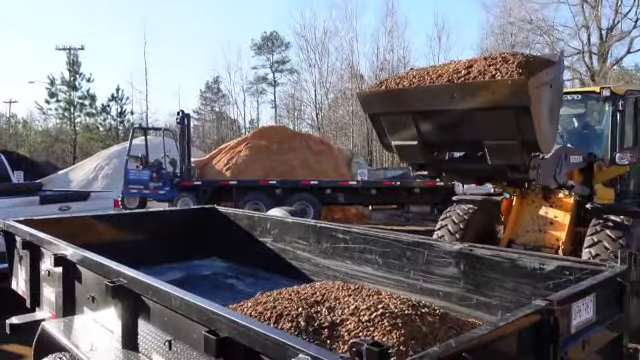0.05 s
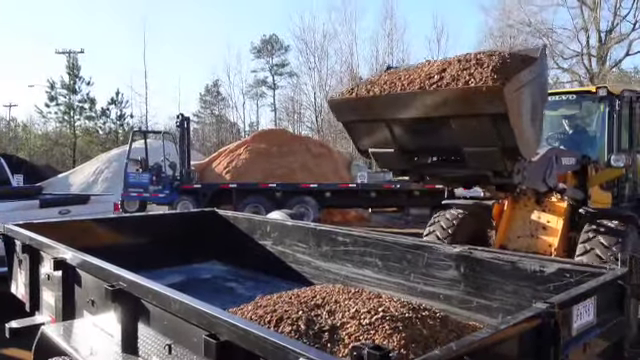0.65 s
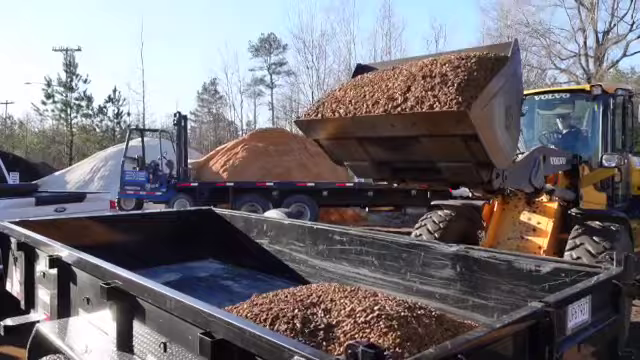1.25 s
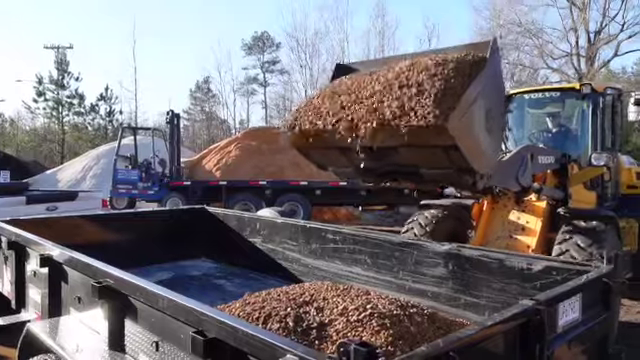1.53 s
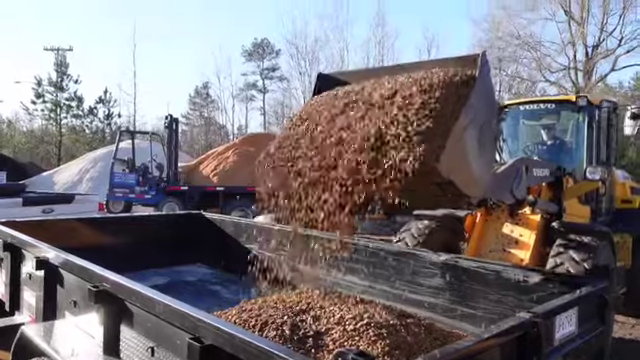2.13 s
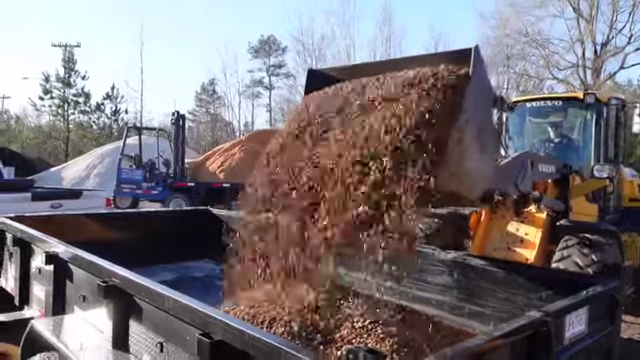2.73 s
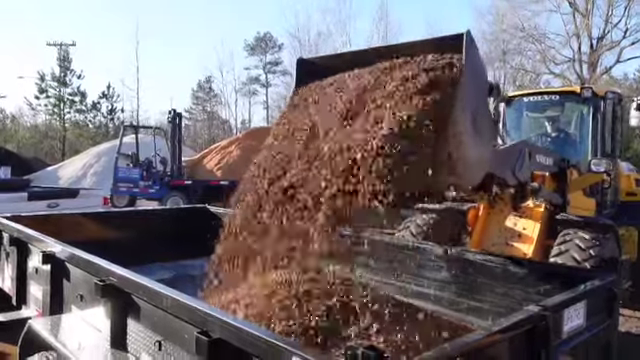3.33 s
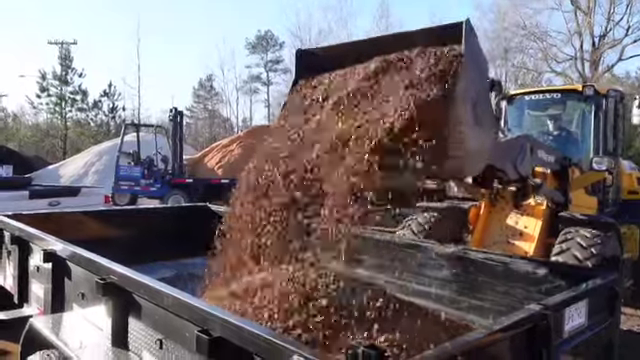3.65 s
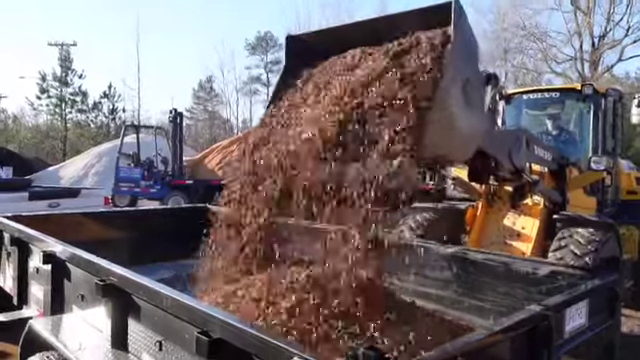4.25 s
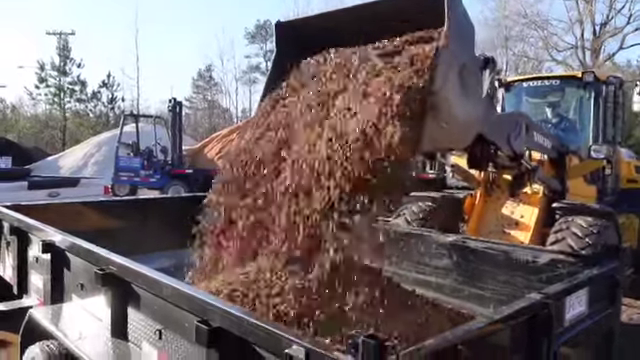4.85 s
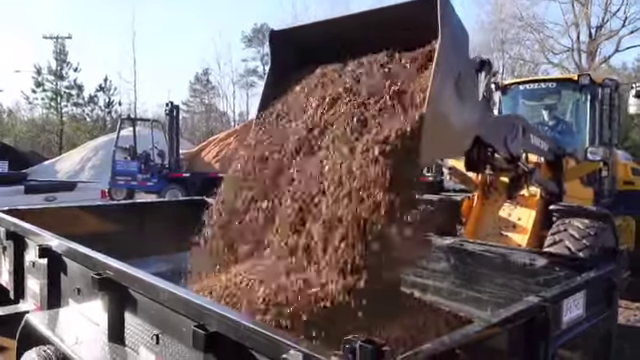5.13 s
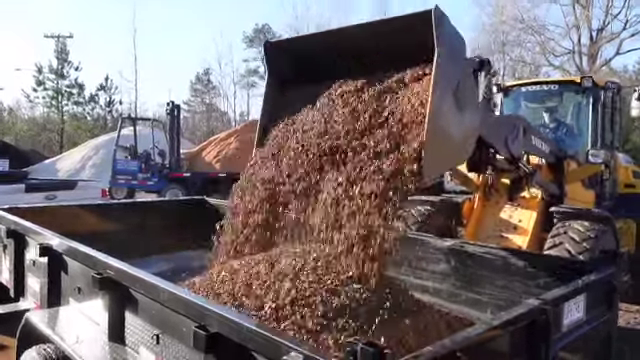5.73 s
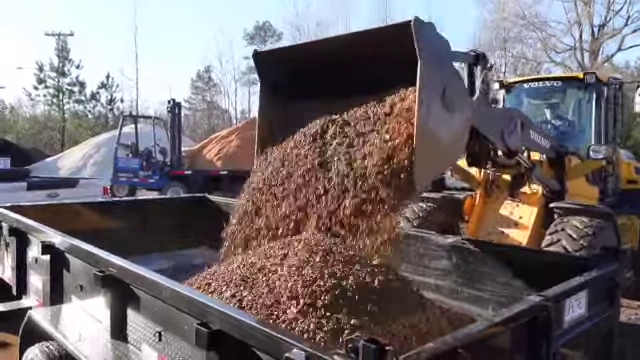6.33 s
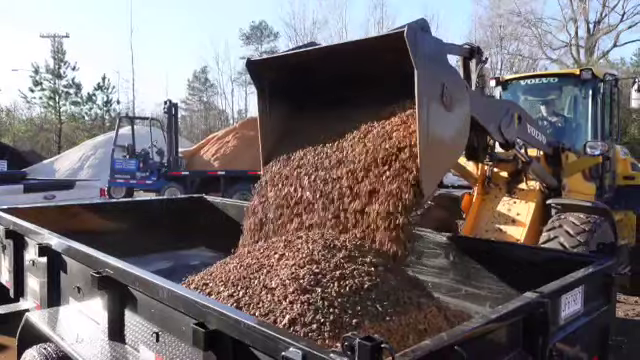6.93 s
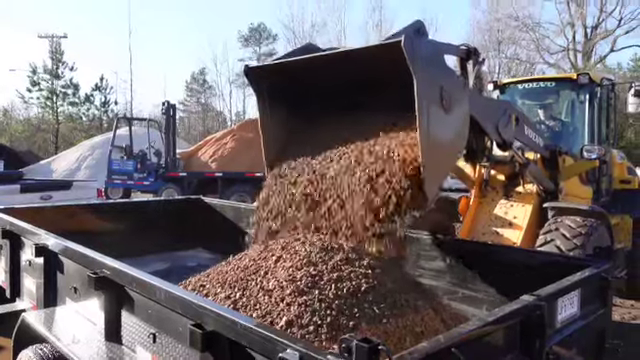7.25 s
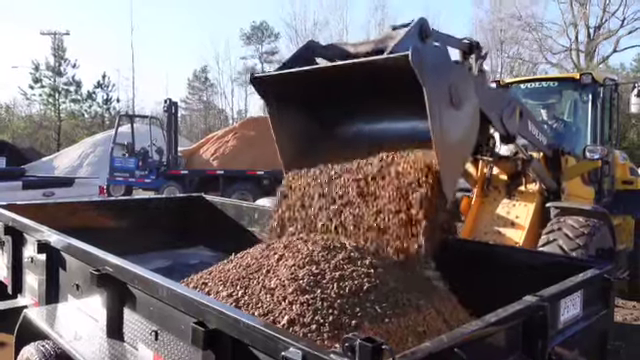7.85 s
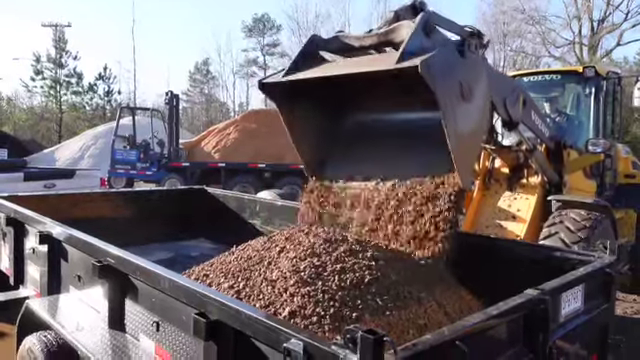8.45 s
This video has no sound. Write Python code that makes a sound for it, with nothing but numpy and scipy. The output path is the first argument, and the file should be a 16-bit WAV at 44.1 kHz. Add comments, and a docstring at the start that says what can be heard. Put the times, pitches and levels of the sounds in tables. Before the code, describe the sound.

Over a steady diesel engine, stones spill and then cascade into a metal trailer, clacking, drumming and ringing the steel.

```python
"""A wheel loader runs at raised revs; its arm knocks and a hydraulic valve gives a short hiss.
From 1.3 s river rock slides in the bucket, a few stones spill, and at 2 s the load pours into a steel
trailer: stones clack on the heap, drum on the bed and ring the bare steel until gravel covers it.
Gain control holds the rush near one level and pushes the engine down under it. Later the hydraulics
whine as the bucket tips, and masses of stone slump down the heap."""
import sys
import numpy as np
from scipy import signal
from scipy.fft import irfft
from scipy.io import wavfile
from scipy.ndimage import uniform_filter1d, minimum_filter1d

SR = 44100
rng = np.random.default_rng(int(sys.argv[2]) if len(sys.argv) > 2 else 0)


def transcribe(signal):
    """Save signal, clipped to [-1, 1], as a 16-bit WAV file at the path in sys.argv[1]."""
    frames = np.atleast_2d(signal).T
    limited = np.clip(frames, -1, 1)
    pcm = np.round(limited * 32767).astype(np.int16)
    wavfile.write(sys.argv[1], SR, pcm)


N = 383669
TIME = np.arange(N) / SR

# tone of stone on stone: f/Hz, level/dB
CLATTER_EQ = [(100, -73), (300, -17), (900, -40.5), (2000, -12), (3200, -1), (4800, 4), (7500, 6),
              (9500, 3), (12000, 0.5), (16000, -8)]
# tone of the drumming bed: f/Hz, level/dB
DRUM_EQ = [(80, -47), (250, -21), (430, -8), (590, -6.5), (740, -0.5), (920, -0.5), (1300, 3), (1480, 3),
           (1650, 3.5), (2400, 3.5), (3300, 3.5), (4500, -1), (7000, -10.5), (14000, -30.5)]
# tone of the booming trailer body: f/Hz, level/dB
BOOM_EQ = [(30, -44), (70, -25), (130, -20.5), (200, -5.5), (300, -10.5), (400, 4.5), (520, 6.5), (750, -8),
           (1500, -13)]
# drumming against the clatter, as the stream wanders between heap and steel: t/s, level/dB
DRUM_FADER = [(2.0, -11), (2.33, -13), (2.55, -8), (2.68, -8.5), (2.9, -1.5), (3.12, 0.5), (3.65, -6),
              (3.92, -11.5), (4.1, -7), (4.55, -9), (4.95, -7.5), (5.15, -5), (5.6, -3), (5.98, -10.5),
              (6.45, -10), (7.1, -4), (7.55, 1), (7.9, 2), (8.7, -5)]
# body boom against the clatter: t/s, level/dB
BOOM_FADER = [(2.1, -38), (2.7, -42), (3.1, -18), (3.6, -27), (4.75, -24), (5.05, -34), (6.35, -31),
              (6.6, -24.5), (8.7, -22)]
# how much of the stream hits bare steel, until the heap covers it: t/s, level/dB
STEEL_FADER = [(2.35, -34), (2.43, -6), (2.7, -8), (3.0, 3), (3.27, 2), (3.52, -3.5), (3.65, -10),
               (4.4, -8), (5.4, -13), (6.4, -10.5), (6.75, -9), (7.2, -10.5), (7.7, -25)]
# modes of the struck steel: f/Hz, width/Hz, level/dB
STEEL_MODES = [(3330, 200, -9), (3470, 70, -6), (3570, 80, -3), (3640, 60, 0), (3780, 170, -6)]
# clumps landing together, against the clatter: t/s, clank/dB, drum/dB, boom/dB, half-length/s
CLUMP_HITS = [(2.123, 7, -4, -40, 0.016), (2.155, 3, 3.5, -40, 0.03), (2.199, -4, -0.5, -32, 0.028),
              (2.426, -6.5, -16, -43, 0.031), (2.5, 2, -14, -40, .014), (2.522, -15, -1, -34, 0.016),
              (2.558, 3.5, -2, -37, 0.013), (2.594, -16, -1.5, -33, 0.039), (2.644, 0, -18, -40, 0.014),
              (2.763, -7, -5, -20, 0.062), (2.843, 6, -16, -35, 0.027), (2.883, 3, -10, -37, .017),
              (3.524, -2.5, -1, -27, 0.03), (4.004, 2, -5, -34, 0.029), (4.061, 1.5, -2.5, -27, 0.016),
              (4.353, -1, -4, -22, 0.018), (4.499, 1, -13, -28, 0.0057), (4.852, -1, -5, -20, .018),
              (5.617, -16, 0.5, -30, 0.051), (6.144, 1, -20, -35, 0.011), (6.903, -20, -1, -11, 0.038),
              (7.228, 0.5, -9, -28, .013), (7.308, -6, -17, -13, 0.019), (8.353, -22, -17, -13.5, 0.083)]
# slumps down the heap, against the clatter: crest t/s, level/dB, half-length/s, f/Hz, width/Hz
SLUMP_SWELLS = [(5.2, -6, 0.18, 4800, 1760), (5.58, 2, .17, 4580, 1520), (8.352, -2, 0.38, 4000, 1410)]
# single large stones cracking: t/s, level/dB
CRACK_HITS = [(1.86, 1), (1.925, 2), (2.0936, 2), (4.289, 11), (6.849, 3), (7.018, 18.5)]
# crankshaft speed: t/s, f/Hz
CRANK_SPEED = [(0, 25.4), (0.15, 25.6), (0.35, 25.8), (0.6, 25.6), (0.9, 25.35), (1.15, 25.25), (1.4, 25.4),
               (2.1, 25.35)]
# engine and pump tones: multiple of the crank speed, lifting level/dB, tipping level/dB
ENGINE_ORDERS = [(2, -79, -76), (3.95, -69, -64.5), (5.87, -66, -64.5), (7, -69, -66), (8.1, -72, -64.5),
                 (9, -60.5, -63.5), (11.9, -62, -67), (14.93, -57, -65), (17.93, -45.5, -49.5),
                 (20.86, -48, -49), (26.96, -49, -44), (30.6, -43.5, -46.5), (34.9, -49, -57),
                 (47.3, -66, -58), (45, -48, -52), (51.5, -62, -44.5), (87, -50.5, -50.5), (132, -52, -52)]
# tone of the fan and combustion noise: f/Hz, level/dB
ROAR_EQ = [(30, -41), (70, -28), (150, -20), (300, -13.5), (410, -3.5), (600, -7), (760, -2), (1250, 2),
           (1900, -5.5), (3400, -8.5), (4400, -14), (5500, -13), (7200, -22), (15000, -39)]
# hydraulic whines while the bucket tips: t/s, f/Hz, level/dB, attack/s, hold/s, release/s
PUMP_WHINES = [(3.75, 459, -26, 0.082, .32, .17), (4.45, 454, -30, 0.088, .05, 0.29),
               (5.18, 520, -31, .1, .15, .2), (7.25, 1597, -16, .2, 0.39, 0.14)]
# knocks of the loader arm and loose stones: t/s, body/dB, tick/dB, decay/s
KNOCK_HITS = [(0.048, -27, -58, 0.039), (0.33, -22, -34.5, 0.0076), (0.339, -34, -50, 0.012),
              (0.526, -40, -42, .012), (0.552, -43, -40, .014), (0.674, -50, -36, .012),
              (0.768, -50, -32, .012), (0.868, -42, -40, .008), (1.409, -52, -34, .008),
              (1.429, -50, -37, .008), (1.834, -45, -23, 0.0056)]
# tone of a knock's dull body and of its bright tick: f/Hz, level/dB
BODY_EQ = [(60, -52), (200, -24), (650, -14), (950, 5), (1500, -10), (3500, -30), (9000, -48)]
TICK_EQ = [(100, -50), (800, -42), (2800, 16.5), (9000, 5), (15500, -10)]
# thin hiss of the hydraulic valve: crest t/s, level/dB, half-length/s
VALVE_HISS = (0.345, -49, .06)

POUR_START_S = 2.015


def heap():
    """Pebbles slide off the bucket and clatter on the heap; the trailer walls scatter the clacks."""
    clacks = unit(pebbles(per_s=10000, spread_db=3.5, width_hz=1330))
    clatter = unit(colour(clacks + amp(5) * scatter(clacks, decay_s=0.016), CLATTER_EQ))
    # stones in free fall clack brightly; the clatter dulls as the drumming grows
    tilt = ramp(POUR_START_S, .1) * (-0.65 - 0.07 * curve(DRUM_FADER)) + 0.84 * wander(18)
    lows = passed(clatter, "lowpass", 6300)
    clatter = lows * amp(-.5 * tilt) + (clatter - lows) * amp(1.53 * tilt)
    sliding = ramp(start_s=1.33, length_s=0.7) * amp(-32.5 + 1.2 * wander(40))
    return clatter * (flow() * amp(1.2 * wander(17)) + sliding)


def pebbles(per_s, spread_db, width_hz, sizes=20):
    """Stone on stone: each size of pebble gives its own very short clack."""
    pitches = np.linspace(500, 16000, sizes)
    return sum(ringing(impacts(per_s / sizes, spread_db), hz, width_hz) for hz in pitches)


def flow():
    """Envelope of the falling stream: a first spill, then the whole load in one broad swell."""
    spill = amp(-23) * ramp(start_s=1.85, length_s=0.043)
    swell_db = 4 * swell(crest_s=4.46, half_s=1.0)  # heaviest with the bucket half empty
    return spill + amp(-6 + swell_db) * ramp(POUR_START_S, .4)


def trailer():
    """The bed drums and booms under the stream, and the steel rings where stones strike it."""
    surge_db = 0.94 * wander(6.3)
    drum = unit(colour(scatter(impacts(per_s=2300, spread_db=1.0), decay_s=0.0078), DRUM_EQ))
    boom = unit(colour(scatter(impacts(per_s=1500, spread_db=3.5), decay_s=0.023), BOOM_EQ))
    drum *= np.hypot(amp(curve(DRUM_FADER) + surge_db), clumps(column=2))
    boom *= np.hypot(amp(curve(BOOM_FADER) + surge_db), clumps(column=3))
    # open plate rings freely; plate under gravel, or under a clump, only clanks
    bare_db = curve(STEEL_FADER)
    open_share = np.interp(bare_db, [-12, -4], [.08, .8])
    ring = steel_ring(per_s=220, spread_db=1, damping=1.5)
    ring *= np.sqrt(open_share) * amp(bare_db + 0.58 * wander(25))
    clank = steel_ring(per_s=130, spread_db=3.0, damping=5.4)
    clank *= np.hypot(np.sqrt(1 - open_share) * amp(bare_db), clumps(column=1))
    return flow() * (drum + boom + ring + clank)


def steel_ring(per_s, spread_db, damping):
    """Each stone that meets the steel sets one of its modes ringing; damping widens the modes."""
    ring = sum(amp(db) * unit(ringing(impacts(per_s, spread_db), hz, width_hz * damping))
               for hz, width_hz, db in STEEL_MODES)
    ring = passed(ring, "highpass", 1980, order=4)
    return unit(passed(ring, "lowpass", 5800, order=4))


def clumps(column):
    """Envelope for one trailer layer: a quick swell each time a clump lands."""
    power = np.zeros(N)
    for row in CLUMP_HITS:
        crest_s, db, half_s = row[0], row[column], row[-1]
        t = np.arange(-2 * half_s, 2 * half_s, 1 / SR)
        add(power, crest_s + t[0], amp(db) ** 2 * np.exp(-2 * (t / half_s) ** 2))
    return np.sqrt(power)


def slumps():
    """Masses of stone swell and fade as they grind down the heap, lower than the falling clatter."""
    out = np.zeros(N)
    for crest_s, db, half_s, hz, width_hz in SLUMP_SWELLS:
        grains = ringing(impacts(per_s=6000, spread_db=3.5), hz, width_hz)
        grind = unit(ringing(grains, hz, 3 * width_hz))
        out += amp(db) * swell(crest_s, half_s) * grind
    return flow() * passed(out, "highpass", 2500, order=3)


def cracks():
    """Large stones cut through with one sharp clack each."""
    out, t = np.zeros(N), np.arange(256) / SR
    for start_s, db in CRACK_HITS:
        hz = rng.uniform(4800, 9400)
        add(out, start_s, amp(db) * np.exp(-t / 0.00023) * np.sin(2 * np.pi * hz * t))
    return passed(out, "highpass", 1500)


def engine():
    """Tones locked to the crank, over fan and combustion noise that throbs with each firing."""
    turns = np.cumsum(curve(CRANK_SPEED) * (1 + 0.0016 * wander(14.4))) / SR
    tipping = ramp(start_s=.55, length_s=.4)  # the load moves from the arms to the bucket
    tones = np.zeros(N)
    for multiple, lift_db, tip_db in ENGINE_ORDERS:
        level = amp(lift_db) + tipping * (amp(tip_db) - amp(lift_db))
        level *= amp(1.6 * wander(3.1))
        cycles = multiple * turns + rng.random() + 0.0023 * multiple * wander(10)
        tones += level * np.sin(2 * np.pi * cycles)
    firing = np.cos(2 * np.pi * 3 * turns)  # six cylinders: three firings a turn
    roar = unit(colour(rng.standard_normal(N) * (1 + 0.062 * firing), ROAR_EQ))
    roar_db = -35.5 + np.interp(TIME, [0, .7, 1.7], [.8, -.6, 1])
    easing = amp(np.interp(TIME, [1.2, 2.2, 3], [0, -2, -3]))  # the tones ease as the bucket lightens
    return np.sqrt(2) * easing * tones + amp(roar_db) * roar


def pump():
    """Wavering whines that swell and fade with the load on the hydraulics."""
    out = np.zeros(N)
    for start_s, hz, db, attack_s, hold_s, release_s in PUMP_WHINES:
        load = ramp(start_s, attack_s) - ramp(start_s + attack_s + hold_s, release_s)
        cycles = np.cumsum(hz * (1 + 0.0054 * wander(25))) / SR
        out += load * amp(db + 0.92 * wander(21)) * np.sin(2 * np.pi * cycles)
    return out


def knocks():
    """The arm and loose stones knock, each hit a dull body with a bright tick on top."""
    body, tick, t = np.zeros(N), np.zeros(N), np.arange(SR // 5) / SR
    for start_s, body_db, tick_db, decay_s in KNOCK_HITS:
        bursts = rng.standard_normal((2, len(t))) * np.exp(-t / decay_s)
        add(body, start_s, amp(body_db) * bursts[0])
        add(tick, start_s, amp(tick_db) * bursts[1])
    return colour(body, BODY_EQ) + colour(tick, TICK_EQ)


def valve():
    """Oil hisses briefly as the bucket valve opens."""
    crest_s, db, half_s = VALVE_HISS
    hiss = unit(passed(rng.standard_normal(N), "highpass", 14000, order=8))
    return amp(db) * hiss / (1 + ((TIME - crest_s) / half_s) ** 4)


def impacts(per_s, spread_db):
    """Random blows: many small, a few large."""
    when, chance, side = rng.random((int(per_s * N / SR), 3)).T
    strength = amp(-spread_db * np.log(np.maximum(chance, .006)))
    return np.bincount((when * N).astype(int), strength * np.sign(side - .5), N)


def ringing(blows, hz, width_hz):
    """One mode: every blow starts a dying cosine."""
    radius, cosine = np.exp(-np.pi * width_hz / SR), np.cos(2 * np.pi * hz / SR)
    return signal.lfilter([1, -radius * cosine], [1, -2 * radius * cosine, radius ** 2], blows + 1e-18)


def scatter(blows, decay_s):
    """A noise tail after each blow: dense modes and reflections, different for every spot."""
    keep = np.exp(-2 / (decay_s * SR))
    energy = signal.lfilter([1 - keep], [1, -keep], blows ** 2)
    return unit(np.sqrt(energy) * rng.standard_normal(N))


def colour(x, eq, size=4096):
    """Minimum-phase EQ of unit energy, so that clicks keep their edge."""
    hz, db = np.transpose(eq)
    bin_hz = abs(np.fft.fftfreq(size, 1 / SR))
    log_gain = np.log(amp(np.interp(np.log(bin_hz + 1), np.log(hz), db)))
    response = np.exp(np.conj(signal.hilbert(log_gain)))
    taps = np.fft.ifft(response).real[:size // 2]
    return signal.oaconvolve(np.atleast_2d(x), taps[None] / np.linalg.norm(taps), axes=1)[:, :N]


def passed(x, kind, hz, order=2):
    """High-pass or low-pass filter."""
    return signal.sosfilt(signal.butter(order, hz, kind, fs=SR, output="sos"), x)


def wander(hz, bins=1024):
    """Random modulation of rms 1, up to about hz."""
    bin_hz = np.arange(bins) * SR / N
    spectrum = rng.standard_normal(bins) + 1j * rng.standard_normal(bins)
    drift = unit(irfft(spectrum / np.sqrt(1 + (bin_hz / hz) ** 4), 4 * bins))
    return np.interp(TIME, np.linspace(0, N / SR, len(drift)), drift)


def curve(rows):
    """Automation: (time, value) points joined by straight lines."""
    return np.interp(TIME, *np.transpose(rows))


def ramp(start_s, length_s):
    """Linear fade from 0 to 1, then holds."""
    return np.clip((TIME - start_s) / length_s, 0, 1)


def swell(crest_s, half_s):
    """Bell-shaped envelope, down to 1/e at half_s from its crest."""
    return np.exp(-((TIME - crest_s) / half_s) ** 2)


def amp(db):
    """Decibels to gain."""
    return 10 ** (np.asarray(db) / 20)


def unit(x):
    """Scales to rms 1."""
    return x / np.sqrt(np.mean(x ** 2) + 1e-20)


def add(mix, start_s, sound):
    """Drops a sound into the mix."""
    part = mix[max(round(start_s * SR), 0):][:len(sound)]
    part += sound[:len(part)]


def scene(loader_pan=.115):
    """The loader stands a little to the right, the trailer straight ahead."""
    loader = engine() + knocks() + valve() + pump()
    left_right = np.array([[1 - loader_pan], [1 + loader_pan]])
    return left_right * loader + heap() + slumps() + trailer() + cracks()


def record(dry, threshold_db=-14.28, slope=0.83, recover_db_per_s=70, ceiling=.85, top_hz=16050):
    """Gain control ducks at once and recovers steadily; a fast limiter and a high cut follow."""
    power = uniform_filter1d((dry ** 2).mean(0), size=260)
    power_db = 10 * np.log10(abs(power) + 1e-12)
    recovery_db = TIME * recover_db_per_s
    envelope_db = np.maximum.accumulate(power_db + recovery_db) - recovery_db
    over_db = np.maximum(envelope_db - threshold_db, 0)
    held = dry / amp(slope * uniform_filter1d(over_db, size=160))
    limiter_gain = minimum_filter1d(ceiling / np.maximum(abs(held).max(0), ceiling), size=121)
    limited = held * uniform_filter1d(uniform_filter1d(limiter_gain, size=61), size=61)
    high_cut = signal.firwin(511, top_hz, window=("kaiser", 9), fs=SR)
    return signal.oaconvolve(limited, high_cut[None], "same")


dry = scene()
out = record(dry)
transcribe(out)
```